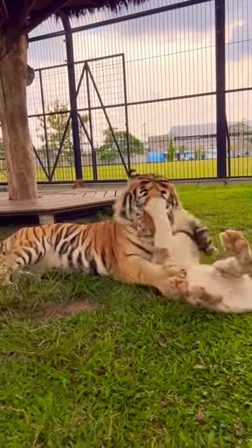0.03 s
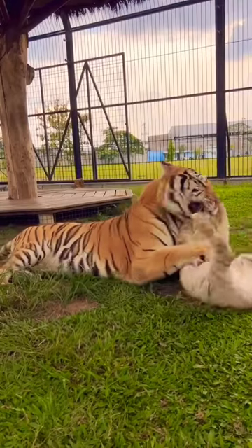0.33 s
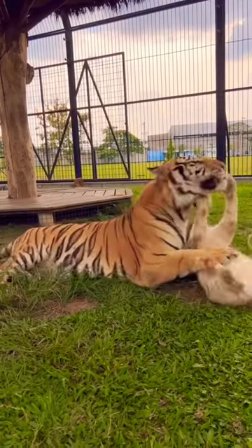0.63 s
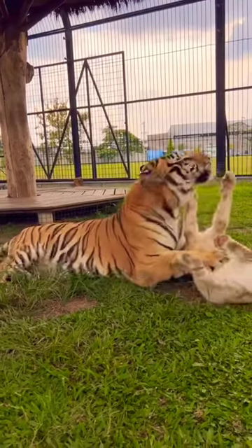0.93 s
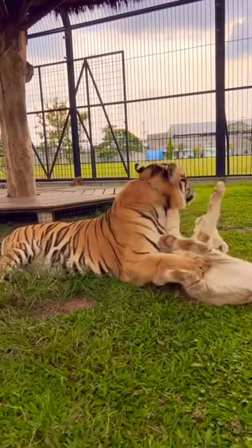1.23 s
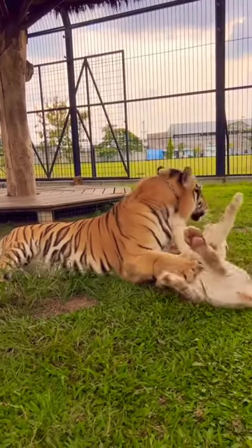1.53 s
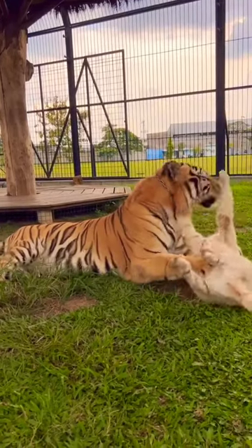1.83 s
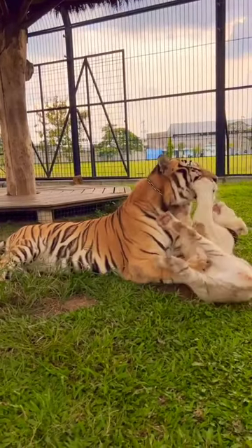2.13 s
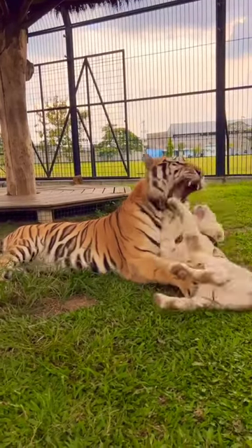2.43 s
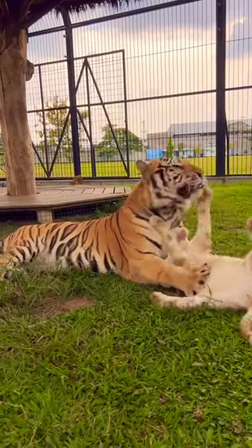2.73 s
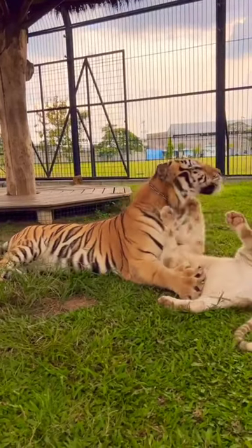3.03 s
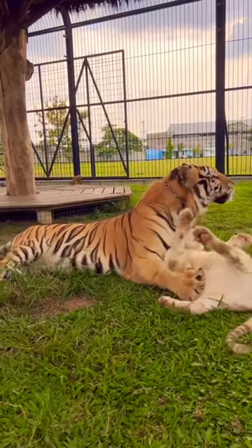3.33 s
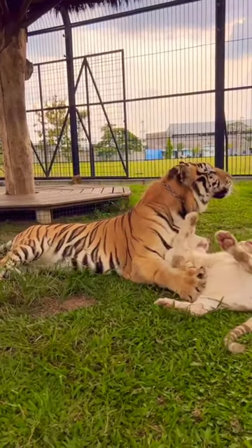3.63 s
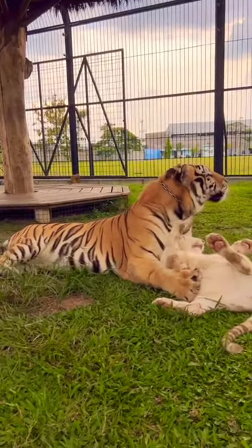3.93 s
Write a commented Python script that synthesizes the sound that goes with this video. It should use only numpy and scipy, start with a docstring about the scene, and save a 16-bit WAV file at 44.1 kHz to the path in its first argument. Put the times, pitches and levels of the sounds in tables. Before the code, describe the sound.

A wrestling big cat gives six quick, gruff barks, three strong, then three weaker and hoarser, echoing slightly in an outdoor pen. Grass rustles and snaps throughout, over a low throbbing drone and wind rumble.

```python
"""Big cats wrestling in an outdoor pen

An animal gives six gruff barks, three strong and voiced, three weaker and hoarse: its vocal folds
vibrate, breath excites the resonances of throat and mouth, and hard walls reflect the sound.
Under the cats the grass rustles and snaps, fur scuffs the ground, and there are a few soft bumps.
Faint bird chips, a throbbing drone, a low rumble, deep gusts of wind and a far wash lie behind."""
import sys
import numpy as np
from scipy import signal
from scipy.fft import rfft, irfft, next_fast_len
from scipy.io import wavfile
from scipy.ndimage import uniform_filter1d, minimum_filter1d, map_coordinates

SR = 44100
rng = np.random.default_rng(int(sys.argv[2]) if len(sys.argv) > 2 else 0)


def generate_wav(signal):
    """Clip the signal to [-1, 1] and save it as 16-bit WAV at the path in sys.argv[1]."""
    frames = np.transpose(np.atleast_2d(signal))
    scaled = np.clip(frames, -1, 1) * 32767
    pcm = np.round(scaled).astype(np.int16)
    wavfile.write(sys.argv[1], SR, pcm)


N = 176400
T = np.arange(N) / SR

# Harmonic series of the voice, from the fundamental up: level_db
HARMONICS = [0.5, -14, -17, -29, -32]
# Voiced part of each bark: start_s, length_s, attack_s, top_pitch_hz, jitter_ratio, level_db
BARKS = [(1.266, .13, 0.015, 466, 0.028, -7.5), (1.469, .145, 0.038, 464, 0.0336, -10.5),
         (1.699, 0.11, 0.018, 431.4, 0.034, -11), (2.115, 0.1, 0.029, 389.2, 0.061, -17),
         (2.52, 0.114, 0.037, 384.6, .1, -21.5), (2.785, 0.096, 0.02, 365, .17, -27)]
JITTER_HZ = 129  # bandwidth of the voice's irregularity

def barks():
    """Vocal fold vibration: harmonics follow a pitch arch and roughen as the jitter grows."""
    out = np.zeros(N)
    for start, length, attack, top_hz, jitter, db in BARKS:
        t = np.arange(0, length, 1 / SR)
        u = t / length
        arch_hz = top_hz * (1 - .2288 * (2 * u - 1) ** 2)
        phase = phase_of(arch_hz * (1 + jitter * (.767 + 2 * u ** 2) * wander(len(t), JITTER_HZ)))
        folds = sum(amp(level) * np.cos(k * phase) for k, level in enumerate(HARMONICS, 1))
        shimmer = 1 + .21 * wander(len(t), JITTER_HZ)
        add(out, start, amp(db) * growl_envelope(t, attack, release_s=.033) * unit(folds * shimmer))
    return out

# Resonance curve of the throat: frequency_hz, gain_db
THROAT = [(120, -51), (260, -41), (350, 1), (560, 4), (720, -11), (900, -3), (1100, -9), (1400, -5.5),
          (1800, -6), (2150, -15), (2600, -23.5), (4700, -30), (5500, -18), (6300, -25), (7500, -36.5),
          (15000, -60)]
# Hoarse part of each bark:
# start_s, length_s, attack_s, release_s, level_db, tilt_db_per_octave, frequency_ratio
RASPS = [(1.256, 0.15, 0.015, 0.048, -18, -1.5, 1.03), (1.452, .165, 0.017, 0.043, -18, -2, 1),
         (1.68, .165, 0.034, 0.056, -18, -1.5, .97), (2.101, .16, 0.051, .06, -18, -3.5, 0.99),
         (2.498, .18, 0.061, 0.027, -24.5, -4, .98), (2.755, .175, 0.048, 0.049, -26.5, -5.5, .97)]

def rasps(puff_hz=408.6):
    """Source and filter: the folds chop breath into puffs of noise, which the throat colours."""
    out = np.zeros(N)
    for start, length, attack, release, db, tilt, ratio in RASPS:
        t = np.arange(0, length, 1 / SR)
        airflow = 1 + np.cos(wavering_phase(SR, puff_hz, .12, JITTER_HZ))
        puffs = airflow * rng.standard_normal(SR)
        air = colour(puffs, lambda f: amp(read(THROAT, f) + tilt * np.log2(f.clip(300, 2000) / puff_hz)))
        opening = ratio * (1 + .1 * (t / length - .5))  # the spectrum climbs as the jaws open
        rasp = unit(map_coordinates(air, [np.cumsum(opening)], order=3))
        add(out, start, amp(db) * growl_envelope(t, attack, release) * rasp)
    return out

def growl_envelope(t, attack_s, release_s, flutter_hz=45.3):
    """Amplitude modulation: uneven flutter of the throat rides on a linear attack, hold and release."""
    swell = np.minimum(t / attack_s, 1) * np.minimum((t[-1] - t) / release_s, 1)
    return swell * (1 + .25 * np.sin(wavering_phase(len(t), flutter_hz, .36, flutter_hz)))

# Catches of the throat around the barks: start_s, length_s, pitch_hz, level_db
HUFFS = [(1.249, 0.025, 558, -16.5), (1.425, 0.11, 562.3, -22.5), (1.595, 0.018, 538, -19),
         (1.802, 0.047, 501, -19.5), (2.094, 0.03, 455, -28.5)]

def huffs():
    """Transient oscillation: each catch of the throat sounds a brief, unsteady tone."""
    return blips(HUFFS)

# Ringing tones of the barks, from the mouth and echoing off the walls:
# start_s, length_s, from_hz, to_hz, level_db
BARK_RINGS = [(1.273, 0.11, 851, 918, -28), (1.279, 0.056, 1799, 1830, -25.5),
              (1.282, 0.26, 1340, 1344, -35), (1.344, 0.114, 920, 914.7, -22), (1.469, 0.12, 892, 914, -27),
              (1.475, 0.041, 1786, 1788, -22), (1.474, 0.16, 1340, 1370, -29),
              (1.674, .06, 1810, 1756, -28.5), (1.72, 0.085, 1605, 1568, -26.5),
              (1.75, 0.14, 866.6, 831.3, -26), (2.126, .115, 1740, 1780, -28.5),
              (2.172, 0.077, 871, 910, -24), (2.333, 0.044, 1770, 1750, -35), (2.614, .1, 1630, 1616, -41),
              (2.858, 0.057, 1915, 2016, -41.5)]

def bark_rings(fuzz=.52, width_ratio=.04):
    """Narrow resonance: half-whistled tones with noisy sidebands swell, glide and fade."""
    out = np.zeros(N)
    for start, length, from_hz, to_hz, db in BARK_RINGS:
        u = np.arange(0, length, 1 / SR) / length
        phase = phase_of(from_hz + (to_hz - from_hz) * u)
        a, b = (fuzz * wander(len(u), width_ratio * from_hz) for _ in range(2))
        ring = (1 + a) * np.cos(phase) + b * np.sin(phase)
        add(out, start, amp(db) * unit(np.sqrt(np.sin(np.pi * u)) * ring))
    return out

# Distinct wall echoes: delay_s, left_db, right_db
ECHOES = [(.034, -26, 2), (.083, -8, -5)]
# Reverberation time of the pen: frequency_hz, t60_s
REVERB_TIME = [(200, 0.61), (900, 1), (1800, 1), (5000, 0.49), (12000, 0.21)]
# Colour of the reflections: frequency_hz, gain_db
WALL_COLOUR = [(150, -37), (400, -11), (470, -18.5), (540, -6), (700, -2), (920, -3), (1200, -5),
               (1800, -6.5), (3000, -6.5), (6000, -4), (12000, 5)]

def wall_reflections(x, correlation=.31, rise_s=.0035, tail_db=1):
    """Reflection: hard walls return two echoes and a diffuse tail whose treble dies first."""
    t = np.arange(SR) / SR
    a, b = rng.standard_normal((2, SR))
    noise = np.sqrt(1 + correlation) * a + np.sqrt(1 - correlation) * np.array([b, -b])
    hz, age, bands = signal.stft(noise, SR, nperseg=256)
    bands = bands * amp(-60 * age / read(REVERB_TIME, hz)[:, None])
    response = signal.istft(bands, SR, nperseg=256)[1][:, :SR] * (1 - np.exp(-t / rise_s))
    response *= amp(tail_db) / np.linalg.norm(response[0])
    for delay, left_db, right_db in ECHOES:
        add(response, delay, amp([[left_db], [right_db]]))
    wet = signal.fftconvolve(x[None], response, axes=1)[:, :N]
    return colour(wet, lambda f: amp(read(WALL_COLOUR, f)))

# Spectrum of rustling grass: frequency_hz, gain_db
GRASS_SPECTRUM = [(800, 14), (2500, 2.5), (4500, -0.5), (6300, -0.5), (8500, 0), (10000, -7), (13000, 0),
                  (15500, -8)]
# Strength of the rustle: time_s, level_db
RUSTLE_LEVEL = [(0, -31.5), (.15, -47.5), (.4, -35.5), (.56, -44.5), (.66, -38.5), (.8, -43), (1.55, -42),
                (1.7, -33), (1.95, -42), (2.64, -36.5), (2.76, -39.5), (3.08, -38), (3.5, -46.5), (4, -52)]

def grass_rustle(crackles_per_s=400, spread_db=3.5):
    """Friction noise: swishing blades make a hiss dotted with fine, random crackle."""
    sizes = amp(spread_db * np.minimum(rng.exponential(1, (2, N)), 4))
    crackle = unit(sizes * (rng.random((2, N)) < crackles_per_s / SR) * rng.choice([-1, 1], (2, N)))
    blades = rng.standard_normal((2, N)) + .45 * crackle
    return stereo_noise(blades, GRASS_SPECTRUM) * amp(curve(RUSTLE_LEVEL)[0])

# Snaps and swishes of grass, and a few faint, distant bird chips:
# start_s, level_db, centre_hz, width_octaves, rise_s, decay_s
SNAPS_AND_CHIPS = [(.396, -34, 7200, .2, .0003, .002), (.425, -32, 6550, .12, .012, 0.027),
                   (.488, -33, 6950, 0.27, .0003, .002), (.598, -32.5, 7500, .5, .0003, .0025),
                   (.631, -32.5, 5900, .09, .0006, .009), (.631, -37, 14000, .3, .0005, .008),
                   (.651, -32, 9000, .9, .0003, .002), (.7, -30, 7000, 0.29, .0003, 0.0018),
                   (0.707, -32, 4480, 0.72, .003, 0.01), (.912, -35, 6980, 0.61, .001, .003),
                   (2.28, -29, 3650, .07, 0.0015, .006), (2.418, -37, 4050, .07, .001, 0.0076),
                   (2.805, -22.5, 5400, 1.5, 0.01, 0.017), (2.82, -23, 10500, 1.1, 0.0035, 0.0059),
                   (3.094, -23, 8730, 0.27, .0008, 0.0018), (3.272, -39, 8300, 0.063, .001, 0.0093),
                   (3.54, -34.5, 4200, .05, 0.0083, 0.013)]

def snaps_and_chips():
    """Exponential decay: each grass snap, swish or bird chip is a fast-fading band of noise."""
    t, out = np.arange(4096) / SR, np.zeros((2, N))
    for start, db, hz, octaves, rise, decay in SNAPS_AND_CHIPS:
        mid, side = noise_band((2, len(t)), hz, octaves)
        envelope = (1 - np.exp(-t / rise)) * np.exp(-t / decay)
        add(out, start, amp(db) * envelope * np.array([mid + .5 * side, mid - .5 * side]))
    return out

# Fur and paws brushing the ground: time_s, level_db
SCUFF_LEVEL = [(0, -56), (3.3, -53.5), (3.65, -51), (4, -49)]

def tussle():
    """Superposition of tiny impacts: stalks break and fur scuffs the ground as the cats roll."""
    stalks = amp(-55) * grains(hz_range=(2880, 9700), ring_s=.0004, per_s=110)
    scuffs = amp(curve(SCUFF_LEVEL)[0]) * grains(hz_range=(480, 1890), ring_s=.0016, per_s=98)
    return stalks + scuffs

# Soft bumps: start_s, length_s, pitch_hz, level_db
BUMPS = [(.0, 0.035, 233, -17), (3.487, 0.022, 507, -41), (3.582, 0.02, 1020, -38.5),
         (3.855, 0.033, 733, -43.5), (3.908, .035, 657, -44), (3.96, 0.019, 944, -44)]

def bumps():
    """Tone bursts: a few hundredths of a second of wavering pitch are heard as a bump."""
    return blips(BUMPS)

# Low drone: time_s, pitch_hz, fundamental_db, octave_db
DRONE = [(0, 75.15, -22.5, -49), (.1, 76.47, -19, -29.5), (.47, 78.88, -18.5, -33),
         (.85, 78.97, -19.5, -28.5), (1.03, 80.9, -23, -31), (1.26, 80.6, -28, -34.5),
         (1.36, 81.63, -45, -62), (1.85, 83.36, -30.5, -40), (2.08, 81.2, -71.5, -36),
         (2.3, 82.16, -30, -56), (2.85, 82.75, -25.5, -34), (2.98, 81.83, -43, -35.5),
         (3.7, 80.16, -34, -49), (4, 82, -20.5, -36.5)]
# Hum beside the drone: time_s, level_db
HUM_LEVEL = [(0, -33.5), (.44, -37), (.56, -17), (.7, -26.5), (.83, -18.5), (.98, -32), (2.1, -46),
             (2.45, -29), (3, -38.5), (3.6, -28.5), (4, -43)]

def drone(hum_hz=128.4, waver_hz=8):
    """Slow random modulation: a low tone, its octave and a hum waver in pitch and throb together."""
    hz, low_db, octave_db = curve(DRONE)
    phase = wavering_phase(N, hz, .01, waver_hz)
    hum = amp(curve(HUM_LEVEL)[0]) * np.sin(wavering_phase(N, hum_hz, .01, waver_hz))
    tones = amp(low_db) * np.sin(phase) + amp(octave_db) * np.sin(2 * phase) + hum
    throb = 1 + .13 * wander(N, waver_hz)
    return np.sqrt(2) * tones * throb

# Spectrum of the rumble: frequency_hz, gain_db
RUMBLE_SPECTRUM = [(20, -36), (30, -26), (40, -11), (50, -8), (65, 3.5), (110, 3), (150, -3.5), (240, -3),
                   (300, -10.5), (400, -20), (600, -50), (1500, -94.5)]
# Strength of the rumble: time_s, level_db
RUMBLE_LEVEL = [(0, -24.5), (1, -26.5), (1.9, -26.5), (2.7, -26.5), (3.05, -29.5), (3.6, -27), (4, -29.5)]

def rumble():
    """Low-frequency noise: a broad bass band drifts slowly in level."""
    return stereo_noise(rng.standard_normal((2, N)), RUMBLE_SPECTRUM) * amp(curve(RUMBLE_LEVEL)[0])

# Strength of the wind: time_s, level_db
GUST_LEVEL = [(0, -43), (.7, -44), (1.3, -39), (2.2, -39), (2.7, -37), (3.2, -44), (3.6, -38), (4, -33.5)]

def gusts():
    """Turbulence: pressure fluctuations in the wind make a deep buffeting."""
    return noise_band(N, hz=44, octaves=.3) * amp(curve(GUST_LEVEL)[0])

# Spectrum of the far wash: frequency_hz, gain_db
WASH_SPECTRUM = [(240, -16), (400, -0.5), (785, -1.5), (1150, -6), (2220, -10), (4100, -12.5), (5160, -21),
                 (5660, -15.5), (6490, -18.5), (9970, -20.5), (13100, -23), (15500, -26.5)]

def far_wash():
    """Broadband ambient noise: a faint wash whose level flickers."""
    return stereo_noise(rng.standard_normal((2, N)), WASH_SPECTRUM) * amp(-42 + 2.65 * wander(N, hz=19))

# Likeness of left and right in rustle, rumble and wash: frequency_hz, correlation_ratio
COHERENCE = [(30, .99), (70, 1), (200, 1), (400, 0.89), (800, 0.097), (2000, 0.37), (5000, 0.064),
             (9000, 0.62), (12500, 0.56)]

def stereo_noise(noises, spectrum):
    """Partial coherence: two independent noises become a coloured pair, alike in the bass."""
    same = lambda f: np.clip(read(COHERENCE, f), -1, .993)
    mid = colour(noises[0], lambda f: amp(read(spectrum, f)) * np.sqrt(1 + same(f)))
    side = colour(noises[1], lambda f: amp(read(spectrum, f)) * np.sqrt(1 - same(f)))
    return unit(np.array([mid + side, mid - side]))

def blips(rows):
    """Windowed oscillation: short, unsteady tones swell quickly and fade."""
    out = np.zeros(N)
    for start, length, hz, db in rows:
        u = np.arange(0, length, 1 / SR) / length
        tone = np.sin(wavering_phase(len(u), hz, .1, hz / 2))
        add(out, start, amp(db) * unit(np.sin(np.pi * u ** .48) * tone))
    return out

def grains(hz_range, ring_s, per_s, count=32, spread_db=7):
    """Shot noise: random impulses of uneven size excite a bank of damped resonances."""
    t, out = np.arange(2048) / SR, np.zeros((2, N))
    for hz in np.geomspace(*hz_range, count):
        hits = rng.random(N) < per_s / count / SR
        clicks = hits * amp(spread_db * np.minimum(rng.exponential(1, N), 3))
        grain = t / ring_s * np.exp(-t / ring_s) * np.sin(2 * np.pi * hz * t + rng.normal(0, 1, (2, 1)))
        out += signal.oaconvolve(clicks[None], grain, axes=1)[:, :N]
    return unit(out)

def noise_band(shape, hz, octaves):
    """Band-pass noise of rms 1, bell-shaped in log frequency."""
    bell = lambda f: np.exp(-.5 * (np.log2((f + 1) / hz) / octaves) ** 2)
    return unit(colour(rng.standard_normal(shape), bell))

def wander(size, hz):
    """Low-pass noise: a smooth random drift of rms about 1."""
    return unit(colour(rng.standard_normal(max(size, SR)), lambda f: 1 / (1 + (f / hz) ** 4)))[:size]

def wavering_phase(size, hz, depth, rate_hz):
    """Random frequency modulation: the phase of a tone that strays around hz."""
    return phase_of(hz * (1 + depth * wander(size, rate_hz)))

def phase_of(hz):
    """Phase is the integral of frequency."""
    return 2 * np.pi * np.cumsum(hz) / SR

def colour(x, gain):
    """Linear filtering by a gain given as a function of frequency."""
    size = next_fast_len(x.shape[-1] + 4096)
    return irfft(rfft(x, size) * gain(np.fft.rfftfreq(size, 1 / SR)), size)[..., :x.shape[-1]]

def read(points, hz):
    """Interpolation on a log-frequency axis."""
    f, value = np.transpose(points)
    return np.interp(np.log(hz + 1), np.log(f), value)

def curve(rows):
    """Interpolation of each column of a time table to every sample."""
    t, *columns = np.transpose(rows)
    return [np.interp(T, t, c) for c in columns]

def amp(db):
    """Decibels to amplitude ratio."""
    return 10 ** (np.asarray(db) / 20)

def unit(x):
    """Normalisation to rms 1."""
    return x / np.sqrt(np.mean(x ** 2) + 1e-20)

def add(mix, start_s, sound):
    """Superposition of a sound on the mix, from start_s on."""
    part = mix[..., max(round(start_s * SR), 0):][..., :sound.shape[-1]]
    part += sound[..., :part.shape[-1]]

def scene():
    """Superposition: direct sound, reflections of the calls, the background and the grass."""
    calls = barks() + rasps() + huffs()
    rings = bark_rings()
    direct = calls + rings + bumps() + drone()
    arrivals = np.array([np.r_[0, 0, direct[:-2]], direct])  # the left lags by two samples
    reflected = wall_reflections(calls + amp(-6.5) * rings)
    background = rumble() + gusts() + far_wash()
    return arrivals + reflected + background + grass_rustle() + snaps_and_chips() + tussle()

def record(dry):
    """Peak limiting and band limiting: the gain dips at peaks, then a low-pass trims the top treble."""
    ceiling, window, edge_hz = .9, int(.022 * SR), 15700
    needed = np.minimum(1, ceiling / (abs(dry).max(0) + 1e-9))
    gain = uniform_filter1d(minimum_filter1d(needed, window), window)
    lowpass = signal.firwin(511, edge_hz, window=("kaiser", 9), fs=SR)
    return signal.oaconvolve(dry * gain, lowpass[None], "same")

dry = scene()
out = record(dry)
generate_wav(out)
```